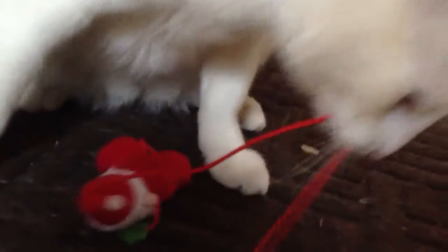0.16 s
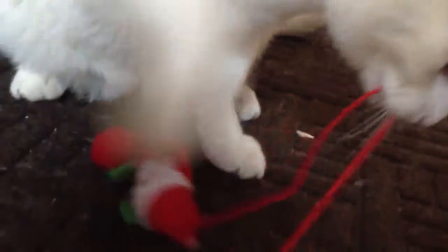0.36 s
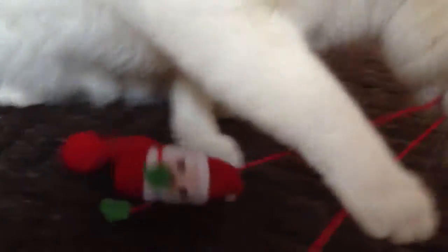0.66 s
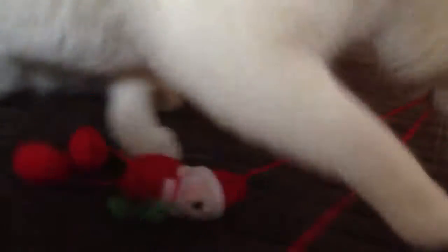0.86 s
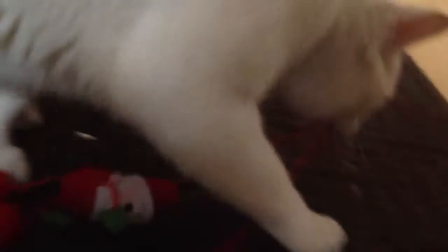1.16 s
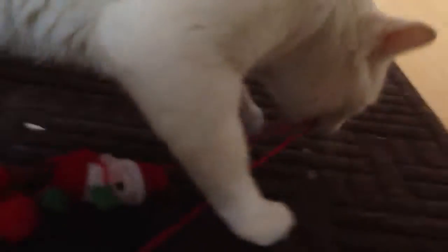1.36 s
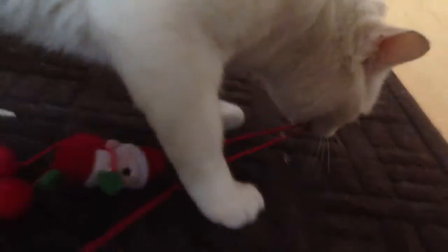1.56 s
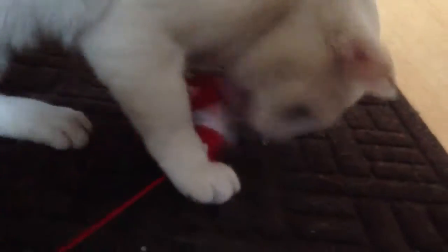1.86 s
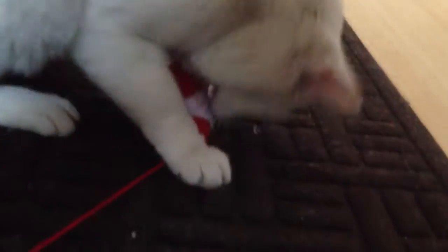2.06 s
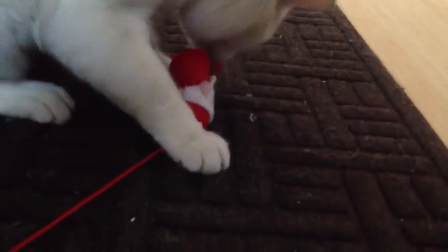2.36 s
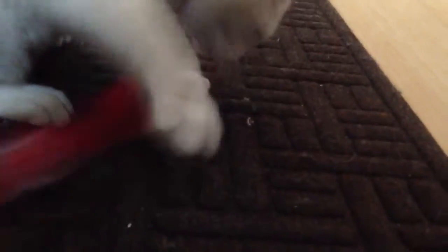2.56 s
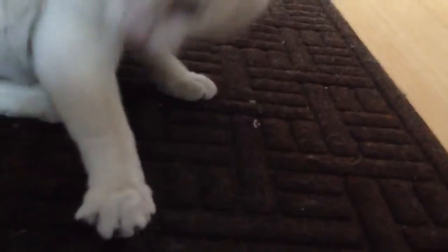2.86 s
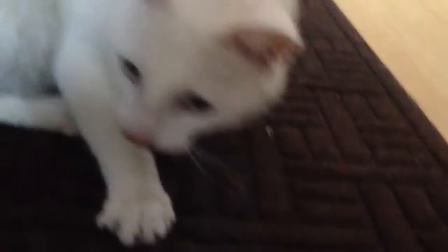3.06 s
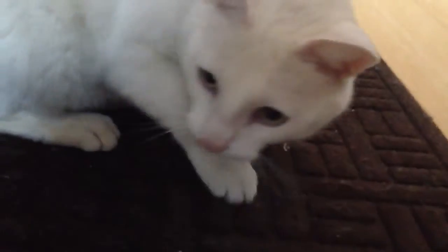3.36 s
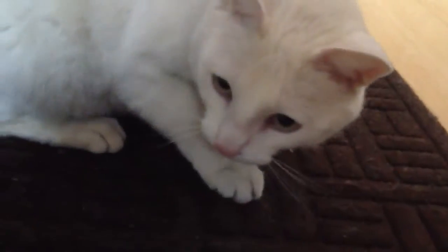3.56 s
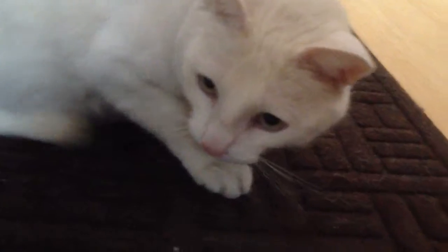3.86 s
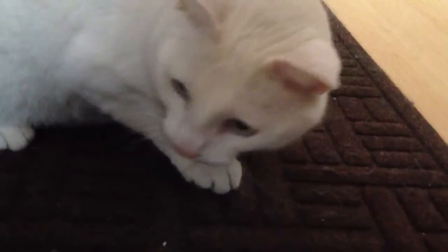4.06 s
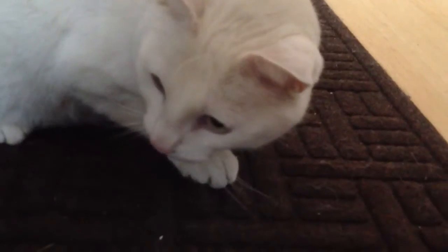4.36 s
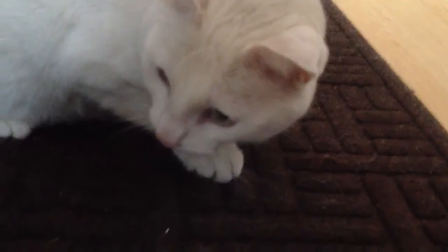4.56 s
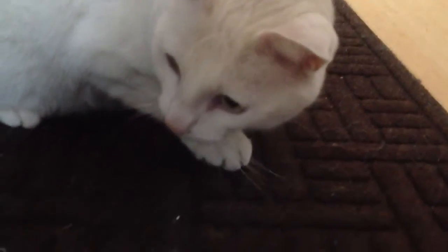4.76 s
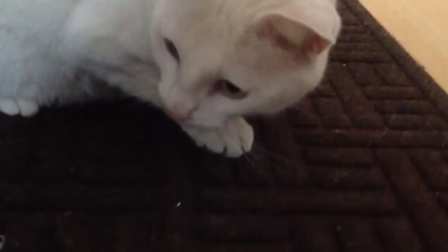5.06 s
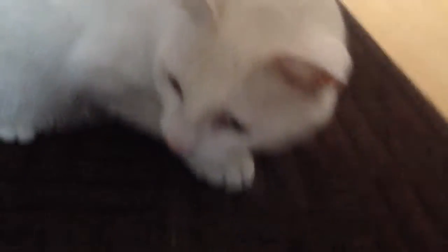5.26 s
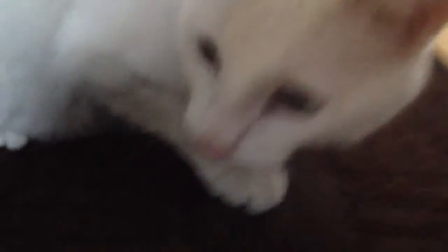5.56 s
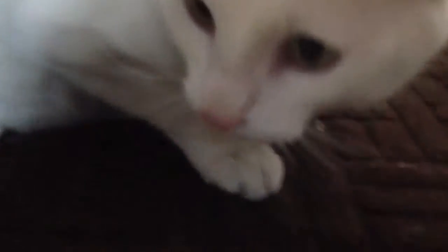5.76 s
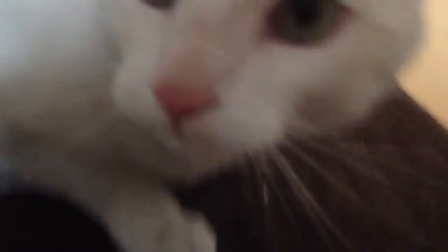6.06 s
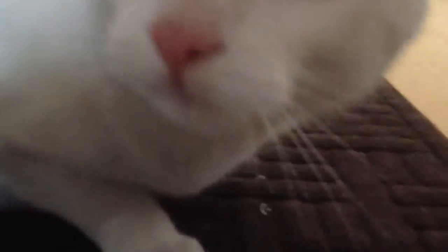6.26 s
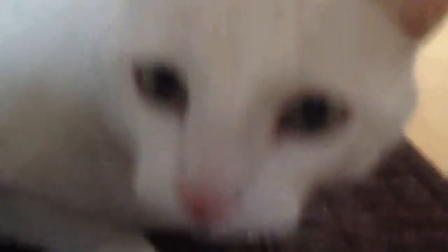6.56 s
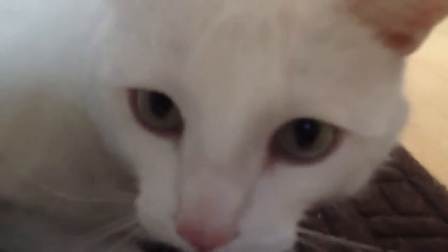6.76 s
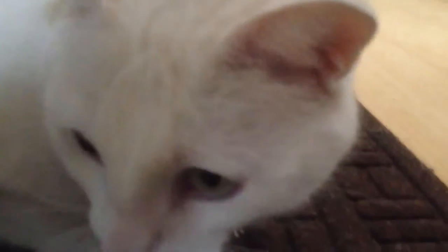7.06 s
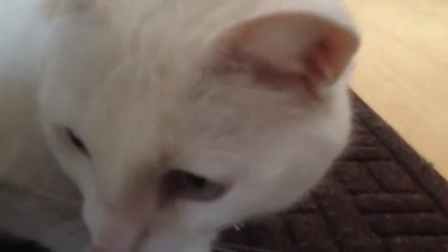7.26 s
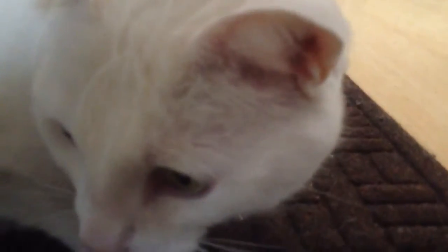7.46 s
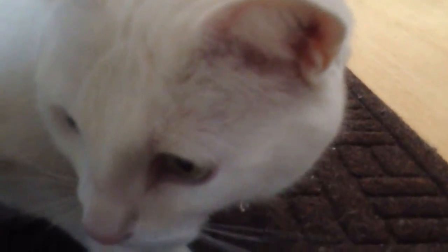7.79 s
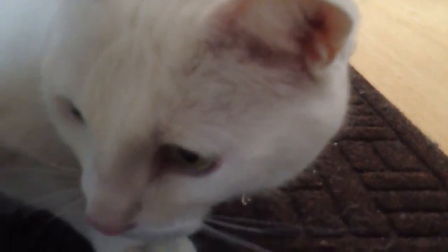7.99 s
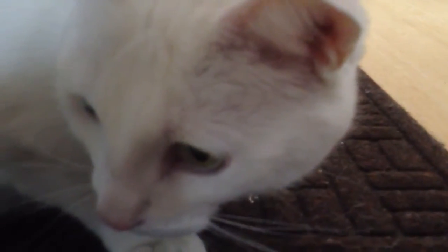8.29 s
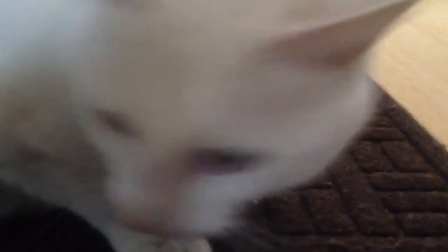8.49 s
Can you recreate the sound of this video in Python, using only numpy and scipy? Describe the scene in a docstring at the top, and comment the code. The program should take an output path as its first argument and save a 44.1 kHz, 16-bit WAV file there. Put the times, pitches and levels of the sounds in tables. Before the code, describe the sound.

A cat purrs in short close pulses while pawing a soft toy over a ribbed mat, then a hard toy clatters loudly on bare floor.

```python
"""Purring cat with a felt toy

A cat purrs close by in a quiet room while it paws a felt toy on a string over a ribbed mat.
Shaped noise makes the scuffs, ticks, fuzzy tones and room hush; trains of soft pulses make the purr.
Damped sines with noise clicks are thuds on the boards under the mat; late on, a hard toy clatters
on the bare floor as noise cracks over low knocks, each with an echo."""
import sys
import numpy as np
from scipy import signal
from scipy.fft import rfft, irfft, next_fast_len
from scipy.io import wavfile
from scipy.ndimage import uniform_filter1d, map_coordinates

SR = 44100
rng = np.random.default_rng(int(sys.argv[2]) if len(sys.argv) > 2 else 0)


def wav_out(sig):
    """Save sig, one row per channel (or a flat mono array), as 16-bit PCM at SR to the path in sys.argv[1]."""
    wavfile.write(sys.argv[1], SR, np.round(np.clip(np.atleast_2d(sig).T, -1, 1) * 32767).astype(np.int16))


N = 380583  # length in samples


def amp(db):
    """Decibels to amplitude."""
    return 10 ** (np.asarray(db) / 20)


def unit(x):
    """Scale x to rms 1."""
    return x / np.sqrt(np.mean(x ** 2) + 1e-20)


def along(points, hz):
    """Read (Hz, value) points on a log frequency axis."""
    point_hz, values = np.transpose(points)
    return np.interp(np.log(hz + 1), np.log(point_hz + 1), values)


def wobble(rate):
    """A smooth random curve with this many knots a second."""
    knots = rng.standard_normal(int(N * rate / SR) + 4)
    return map_coordinates(knots, [np.arange(N) * rate / SR])


def coloured(x, spectrum):
    """Filter x by a curve of (Hz, dB) points."""
    size = next_fast_len(len(x) + 4096)
    gain = amp(along(spectrum, np.fft.rfftfreq(size, 1 / SR)))
    return irfft(rfft(x, size) * gain, size)[:len(x)]


def add(track, s, sound):
    """Mix a sound into the track from second s on."""
    part = track[round(s * SR):][:len(sound)]
    part += sound[:len(part)]


# How fast the room dies away. Each row: frequency in Hz, t60 (time to fall 60 dB) in seconds.
ROOM_DECAY = [(100, 0.49), (500, 0.24), (3000, 0.38), (8000, 0.23), (15000, 0.19)]


def echo(seconds):
    """A fresh noise tail of energy 1 in which each frequency dies at its own speed."""
    hz, t, z = signal.stft(rng.standard_normal(int(seconds * SR)), SR, nperseg=256)
    decay = amp(-60 * t / along(ROOM_DECAY, hz)[:, None])
    tail = signal.istft(z * decay, SR, nperseg=256)[1]
    return tail / np.linalg.norm(tail)


# Colour of the room tone. Each row: frequency in Hz, relative density in dB per Hz.
HUSH_COLOUR = [(25, -20.5), (70, -24), (100, -15.5), (122, 2), (155, -10), (200, -1), (260, -6.5),
               (330, -6.5), (420, -13), (700, -12.5), (1400, -17.5), (5000, -20.5), (9700, -25),
               (13000, -23.5), (15300, -22.5)]
HUSH_DB = -68.5  # centre of a slowly wandering level


def hush():
    """Room tone and microphone hiss: steady noise with a slowly wandering level."""
    noise = unit(coloured(rng.standard_normal(N), HUSH_COLOUR))
    return amp(HUSH_DB + 0.72 * wobble(2.41)) * noise


RISE_DB_PER_S, FALL_DB_PER_S = 450, 280  # every stroke swells fast and fades slower


def swells(rows):
    """One gain per sample for each level column: rise, hold and fall, overlaps added in power."""
    t, power = np.arange(N) / SR, 0
    for s, held, *db in rows:
        rise_db = -RISE_DB_PER_S * np.clip(s - t, 0, .3)
        fall_db = -FALL_DB_PER_S * np.clip(t - s - held, 0, .5)
        power = power + amp(2 * (rise_db + fall_db)) * amp(2 * np.array(db))[:, None]
    return np.sqrt(power)


def rubbing(spectrum, grit_db, rate, patchy_db):
    """Noise of rms 1: fibres catch unevenly and the colour comes in patches."""
    gritty = amp(grit_db * wobble(rate)) * rng.standard_normal(N)
    z = signal.stft(gritty, nperseg=512)[2]
    # blur random values over 5 frequency bins, then over 6 frames
    patches = uniform_filter1d(rng.standard_normal(z.shape), 5, 0)
    patches = uniform_filter1d(patches, 6, 1)
    patchy = signal.istft(z * amp(patchy_db * unit(patches)), nperseg=512)[1][:N]
    return unit(coloured(patchy, spectrum))


# Colours of dull dragging, scratching claws, swishing fur and rumbling boards.
# Each row: frequency in Hz, relative density in dB per Hz.
DRAG_COLOUR = [(200, -16), (400, -0.5), (700, 3), (1000, -1), (1400, -1.5), (2200, -15.5), (5000, -39)]
SCRATCH_COLOUR = [(700, -21), (1400, -6), (1800, 0.5), (3100, -1), (4600, -3.5), (6000, -13.5),
                  (12000, -30.5)]
FUR_COLOUR = [(3000, -31), (4800, -13.5), (5600, -3.5), (7400, -1), (10500, -9.5), (13500, -4.5),
              (15200, -12.5)]
BOARDS_COLOUR = [(40, -60), (90, -26), (160, -2), (215, -1), (300, -7), (400, -17), (800, -46)]
# Strokes over the mat. Each row: moment of full level in seconds, hold in seconds,
# dragging level in dB, scratching level in dB, fur swish level in dB.
MAT_STROKES = [(.17, .12, -80.5, -75.5, -77), (1.02, .002, -72.5, -79, -70), (1.70, 0.17, -73.5, -74, -69),
               (1.897, .004, -64, -65, -71), (1.94, 0.02, -66.5, -69.5, -69.5), (2.444, .03, -61, -64, -63),
               (2.49, .028, -66, -61, -62.5), (2.61, 0.034, -58.5, -55, -51),
               (2.686, .002, -52.5, -50.5, -56.5), (2.812, 0.041, -66.5, -61.5, -58.5),
               (2.9, 0.089, -72, -68.5, -63), (3.0, 0.035, -69, -63, -61), (3.07, .03, -82, -82, -64),
               (3.15, 0.02, -77, -78, -60), (3.2, .002, -64, -71, -74), (3.54, 0.057, -72, -70, -65.5),
               (3.61, 0.025, -67, -64.5, -60.5), (3.768, .01, -65, -58, -60.5),
               (3.93, .01, -65, -68.5, -65), (4.04, .004, -63, -75, -74), (4.07, .02, -62.5, -67, -67),
               (4.15, 0.042, -67.5, -72.5, -76), (4.22, 0.013, -64, -66.5, -73), (5.44, .03, -67, -71, -74),
               (5.49, .03, -57.5, -66, -77), (5.535, .01, -67, -60, -76), (5.58, .14, -67.5, -68.5, -72.5),
               (5.76, .04, -67, -73, -74), (5.82, .1, -66.5, -71, -70.5), (5.95, .03, -72.5, -75, -77),
               (6.0, .04, -78, -79, -70.5), (7.27, 0.0091, -85, -82, -70), (7.31, .002, -68, -65.5, -72.5),
               (7.662, 0.041, -72.5, -80, -67.5), (7.804, .002, -74, -78, -75), (7.9, .02, -74, -80, -72),
               (7.945, .075, -72, -75.5, -65), (8.06, .01, -66, -75, -63), (8.075, .04, -59, -80, -72),
               (8.128, .004, -66, -70, -61), (8.618, .012, -62, -75, -89)]
# Body weight shifting on the boards. Each row: moment of full level in seconds, hold in seconds,
# level in dB.
WEIGHT_SHIFTS = [(1.816, .09, -62), (1.948, 0.018, -62.5), (2.6, 0.017, -62), (2.7, .02, -57.5),
                 (2.82, .005, -62.5), (3.93, .03, -67), (4.82, 0.075, -64.5), (5.43, .02, -60),
                 (5.488, .06, -53), (5.58, .045, -56), (5.69, .13, -58.5), (5.85, .07, -62),
                 (5.96, .06, -69), (7.09, .08, -72)]


def scuffs():
    """Friction noise: dragging sounds dull, claws scratch, fur swishes bright, weight rumbles in the boards."""
    drag, scratch, swish = swells(MAT_STROKES)
    weight, = swells(WEIGHT_SHIFTS)
    return (drag * rubbing(DRAG_COLOUR, grit_db=2.0, rate=120, patchy_db=1.0)
            + scratch * rubbing(SCRATCH_COLOUR, grit_db=1.5, rate=220, patchy_db=2.5)
            + swish * rubbing(FUR_COLOUR, grit_db=2.0, rate=270, patchy_db=2.5)
            + weight * rubbing(BOARDS_COLOUR, grit_db=1.2, rate=45, patchy_db=.8))


# Runs of purring flaps. Each row: first flap in seconds, last flap in seconds, push pitch in Hz,
# then relative effort in dB at the start, halfway and at the end.
PURR_RUNS = [(.901, 1.102, 240, -67, -62, -64), (1.142, 1.343, 238, -68, -66, -63),
             (1.423, 1.463, 240, -82, -74, -67), (2.261, 2.353, 210, -66, -70, -71),
             (2.783, 2.903, 270, -72, -69, -66), (3.012, 3.374, 283, -64, -68, -69),
             (3.417, 3.504, 235, -69, -72, -69), (3.543, 3.712, 236, -61, -65, -59),
             (3.751, 3.831, 226, -60.5, -68, -63), (4.809, 5.06, 235, -66, -64, -62),
             (5.104, 5.4, 245, -65.5, -70, -67), (6.316, 6.397, 225, -70, -66, -63),
             (6.438, 6.718, 225, -59, -58, -56), (6.759, 6.799, 225, -61, -66, -72),
             (7.850, 8.088, 225, -74, -64.5, -59), (8.129, 8.339, 250, -57.5, -54.5, -53.5)]
# What of the purr carries out of the throat. Each row: frequency in Hz, gain in dB.
THROAT_GAIN = [(30, -55), (62, -36), (88, -7), (120, 5), (200, 0), (15000, 2)]
FLAPS_PER_S = 25  # rounded so that each run holds whole flaps


def purr():
    """Each flap of the larynx is a soft push of about two cycles; a small click of the folds leads it."""
    out, t = np.zeros(N), np.arange(-SR // 50, SR // 25) / SR
    for first, last, push_hz, *effort_db in PURR_RUNS:
        times = np.linspace(first, last, round((last - first) * FLAPS_PER_S) + 1)
        effort_curve = np.polyfit([first, (first + last) / 2, last], effort_db, deg=2)
        for k, s in enumerate(times):
            late, size, pitch, snap = rng.standard_normal(4)  # no two flaps are alike
            hz = push_hz * (1 + .08 * pitch)
            push = -np.cos(2 * np.pi * hz * t) * np.exp(-(t / 0.0025) ** 2)
            click_shape = np.exp(-((t + 0.0044) / 0.0007) ** 2)  # 4.4 ms ahead of the push
            click = amp(-18 + 3.0 * snap) * np.sin(2 * np.pi * 900 * t) * click_shape
            swing_db = 0.42 * (-1) ** k  # strong and weak flaps take turns
            level_db = np.polyval(effort_curve, s) + 11.5 + swing_db + 1.4 * size
            add(out, s + t[0] + 0.00062 * late, amp(level_db) * (push + click))
    out = coloured(out, THROAT_GAIN)
    return out + amp(-13) * signal.fftconvolve(out, echo(.4))[:N]


# Ticks and one low thump of noise. Each row: start in seconds, relative level in dB, centre in Hz,
# t60 in seconds.
NOISE_TICKS = [(1.292, -53, 4000, .025), (1.882, -44, 1400, .015), (1.948, -55, 1500, .04),
               (2.044, -53, 327, 0.2), (2.617, -39, 6460, .015), (2.682, -51, 3000, 0.018),
               (3.025, -47, 1500, 0.018), (3.19, -59, 1490, .04), (4.025, -50.5, 1100, 0.034),
               (4.072, -58, 6000, .01), (5.47, -48, 1100, 0.012), (6.141, -57, 3600, 0.016),
               (7.309, -47.5, 1000, 0.012)]


def ticks():
    """Fast-rising, decaying bursts of noise, mostly short, an octave or two wide."""
    out, t = np.zeros(N), np.arange(SR // 20) / SR
    for s, db, hz, t60 in NOISE_TICKS:
        band = [(hz / 6, -40), (hz / 2.0, -4), (hz, 0), (hz * 1.68, -5), (hz * 6, -30)]
        noise = unit(coloured(rng.standard_normal(len(t)), band))
        decay = amp(db - 1.5 - 60 * t / max(t60, .003))
        attack = 1 - np.exp(-t * hz * 3)
        add(out, s, decay * attack * noise)
    return out


# Faint fuzzy tones. Each row: start in seconds, end in seconds, pitch in Hz, level in dB.
FUZZY_TONES = [(1.7, 1.745, 2000, -70.5), (2.87, 2.9, 940, -69), (2.915, 2.96, 915, -67),
               (4.18, 4.26, 700, -68), (4.66, 4.92, 1430, -79)]


def whistles():
    """Noise in a band narrow enough to suggest a pitch, which swells and fades."""
    out = np.zeros(N)
    for start, end, hz, db in FUZZY_TONES:
        t = np.arange(round((end - start) * SR)) / SR
        band = [(hz * 0.87, -60), (hz * 0.96, -5), (hz, 0), (hz * 1.04, -5), (hz * 1.23, -60)]
        noise = unit(coloured(rng.standard_normal(SR), band))[:len(t)]
        swell = np.sqrt(np.sin(np.pi * t / (end - start)))
        add(out, start, amp(db) * swell * noise)
    return out


# Paw and toy thuds. Each row: start in seconds, level in dB, ring pitch in Hz, ring t60 in seconds,
# then click and boom in dB relative to that level.
PAW_THUDS = [(1.848, -62, 300, .05, -20, 0), (2.043, -36.5, 430, 0.011, -30, -17),
             (2.052, -50.5, 202, 0.12, -30, -30), (2.69, -39, 221, 0.049, -24, -28),
             (3.2, -43, 237, 0.085, -24, -35), (3.2086, -46.5, 236, 0.18, -30, -35),
             (4.025, -43.5, 740, 0.034, -19, -34), (5.487, -55, 210, .07, -22, -25),
             (8.143, -44, 333, 0.16, -30, -28), (8.245, -44.5, 336, 0.21, -30, -33)]


def thuds():
    """A soft blow: a short click, one damped ring of the boards and a deep boom."""
    out, t = np.zeros(N), np.arange(SR // 3) / SR
    for s, db, hz, t60, click_db, boom_db in PAW_THUDS:
        ring_attack = 1 - np.exp(-t * hz * 5.7)
        ring = np.sin(2 * np.pi * hz * t) * amp(-60 * t / max(t60, .005)) * ring_attack
        noise = unit(coloured(rng.standard_normal(len(t)), DRAG_COLOUR))
        click = amp(click_db - 60 * t / 0.0048) * noise
        boom_attack = 1 - np.exp(-t / 0.013)
        boom = amp(boom_db - 60 * t / 0.19) * np.sin(2 * np.pi * 52 * t) * boom_attack
        add(out, s, amp(db) * (ring + click + boom))
    return out + amp(-11.0) * signal.fftconvolve(out, echo(.4))[:N]


# Hard toy on the floor. Each row: time in seconds, level in dB, knock in dB relative to that level,
# echo energy in dB relative to the crack, dullness in dB per octave above 1 kHz.
TOY_BOUNCES = [(8.1403, -21, -28, -3, 3.5), (8.196, -50, -20, -8, -1), (8.2396, -30.5, -18, -3.5, 4.5),
               (8.2821, -38.5, -11, 2.5, 7), (8.3525, -35, -21, 1.5, 6.5), (8.372, -2, 0, -12, 0),
               (8.4351, -11.5, -22, -10, 1.5), (8.4623, -24.5, -19.5, -13.5, 3)]
# Colour of a crack before dulling. Each row: frequency in Hz, relative density in dB per Hz.
CRACK_COLOUR = [(100, -18), (320, -2.5), (800, -5), (2000, -4), (4000, -4), (8400, -2.5), (13600, -10.5),
                (16500, -19.5)]


def clatter():
    """Each bounce is a noise crack of a few ms over a low knock, answered by the room."""
    out, t = np.zeros(N), np.arange(SR // 20) / SR
    for s, db, knock_db, echo_db, dull_db in TOY_BOUNCES:
        shape = (1 - np.exp(-t / 0.00059)) ** 2 * np.exp(-(t / 0.002) ** 2)
        colour = [(hz, level - dull_db * np.log2(max(hz, 1000) / 2000)) for hz, level in CRACK_COLOUR]
        crack = unit(coloured(rng.standard_normal(len(t)), colour)) * shape
        knock_tone = np.sin(2 * np.pi * 165 * (t - .0013)) * (t > .0013)
        knock = amp(knock_db - 60 * t / 0.016) * knock_tone
        add(out, s - .0004, amp(db) * (crack + knock))
        # floor and furniture answer first, the far room fades in behind them
        near = coloured(rng.standard_normal(len(t)), colour) * amp(-60 * t / 0.055)
        far = coloured(echo(.6), colour)
        far[:len(t)] *= 1 - np.exp(-t / 0.002)
        strength = amp(db + echo_db) * np.linalg.norm(shape)
        add(out, s + 0.000977, strength * amp(1.5) * near / np.linalg.norm(near))
        add(out, s + .001, strength * far / np.linalg.norm(far))
    # a light toy moves no deep bass
    return signal.sosfilt(signal.butter(2, 120, "high", fs=SR, output="sos"), out)


def scene():
    """All layers summed to one channel."""
    return (hush() + scuffs() + purr() + ticks() + whistles() + thuds() + clatter())[None]


TOP_HZ = 15350  # upper band limit


def record(dry):
    """Gain control ducks after loud blows and recovers slowly; deep bass and all above the band limit are lost."""
    keep = np.exp(-1 / (.3 * SR))  # power is averaged over about 0.3 s
    loud = signal.lfilter([0, 1 - keep], [1, -keep], dry ** 2)
    x = dry * (1 + loud / amp(-41.5) ** 2) ** -.15
    x = signal.sosfilt(signal.butter(2, 60, "high", fs=SR, output="sos"), x)
    return signal.sosfilt(signal.ellip(12, .5, 75, TOP_HZ, fs=SR, output="sos"), x)


dry = scene()
out = record(dry)
wav_out(out)
```